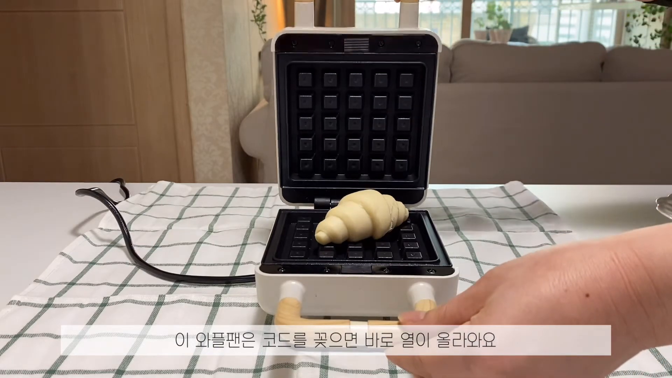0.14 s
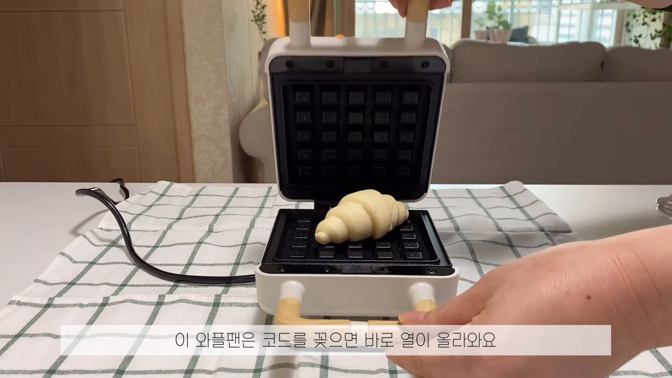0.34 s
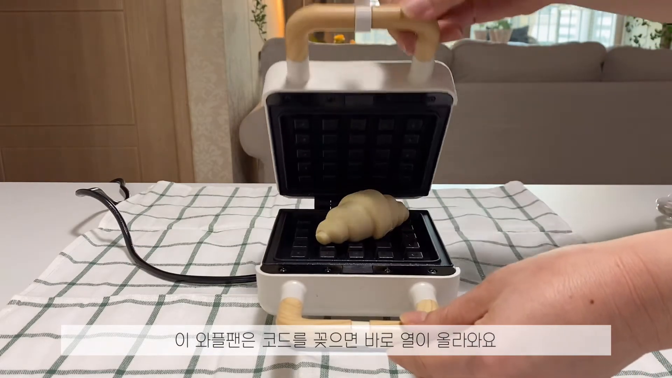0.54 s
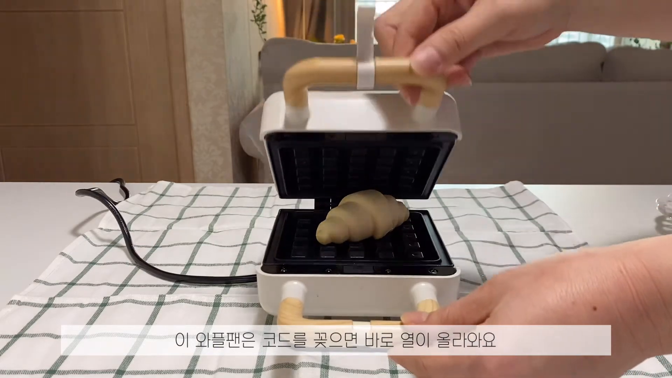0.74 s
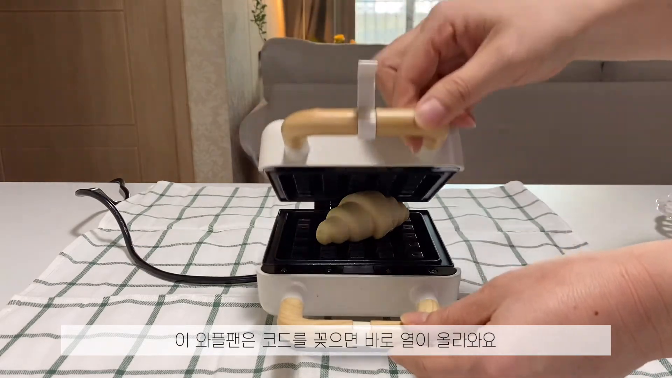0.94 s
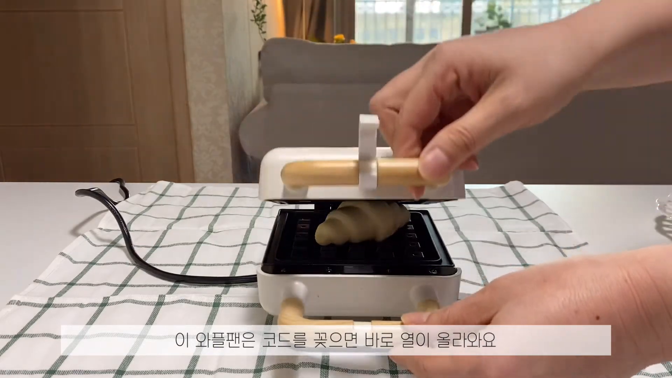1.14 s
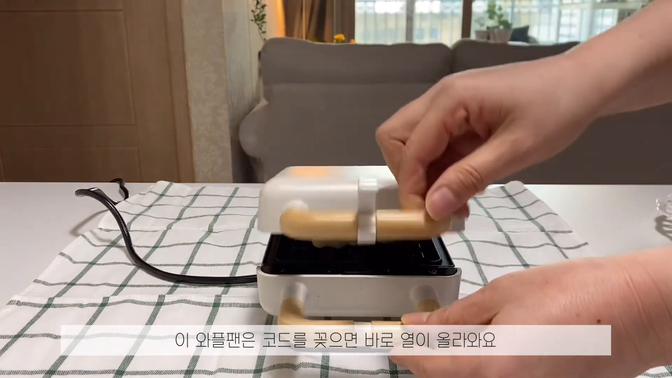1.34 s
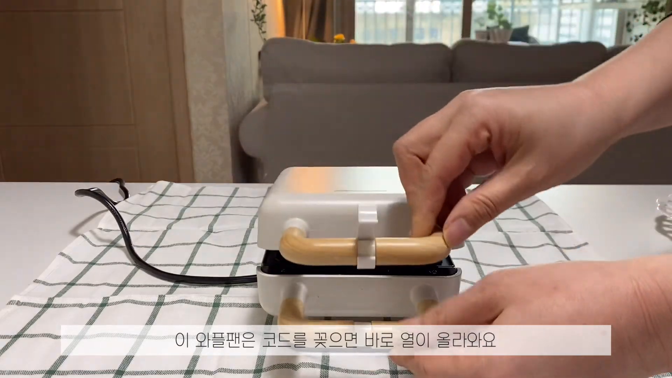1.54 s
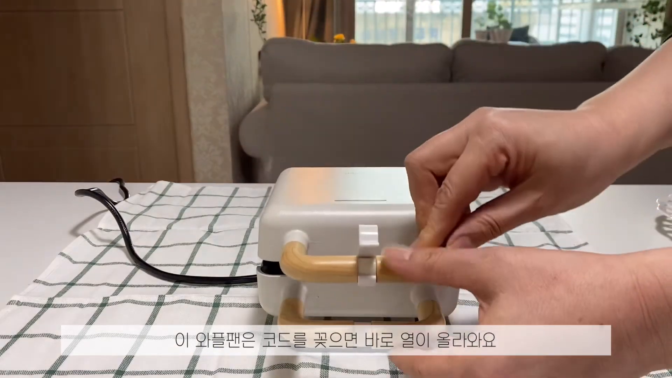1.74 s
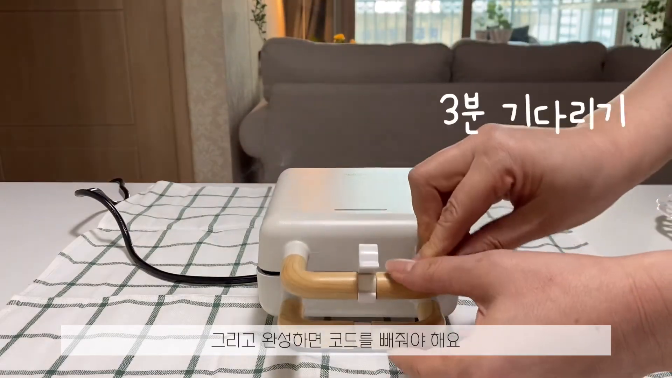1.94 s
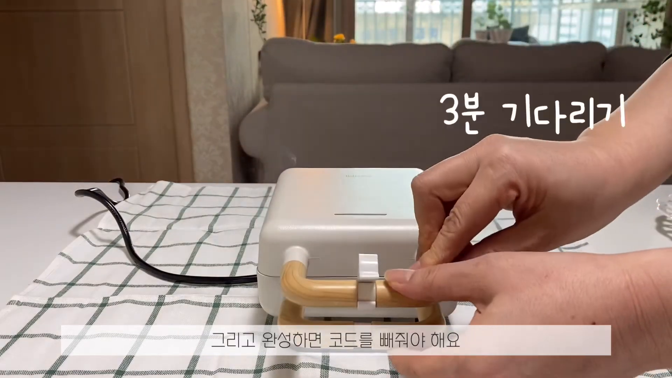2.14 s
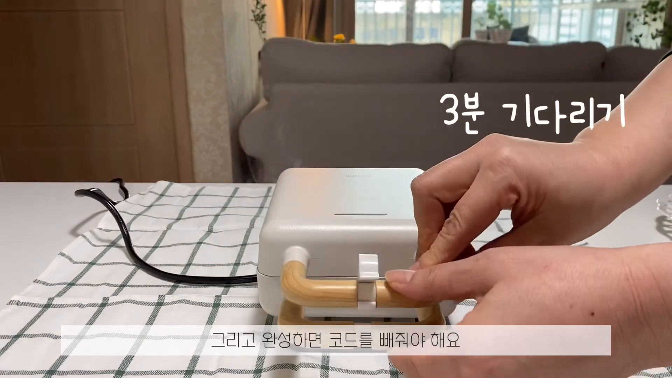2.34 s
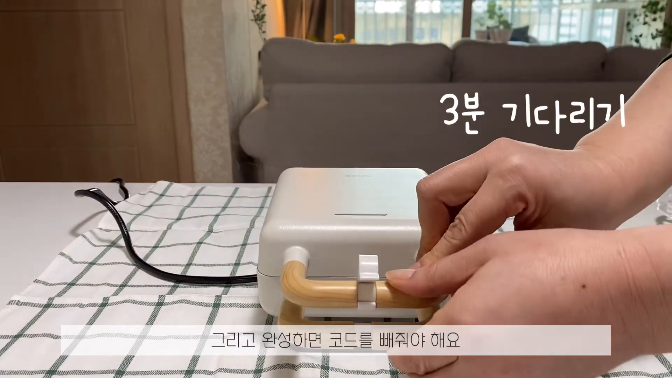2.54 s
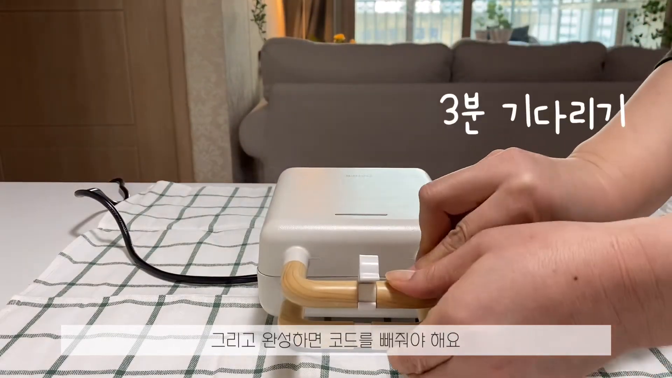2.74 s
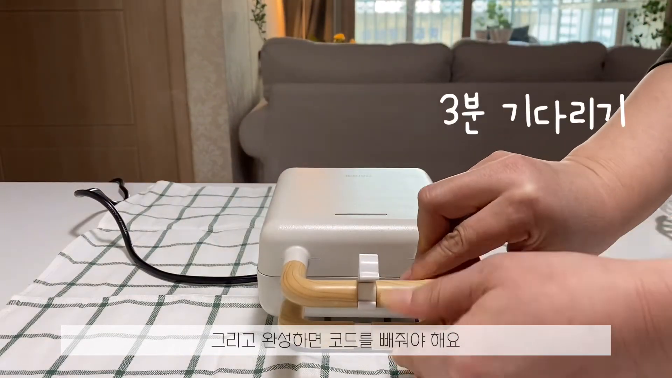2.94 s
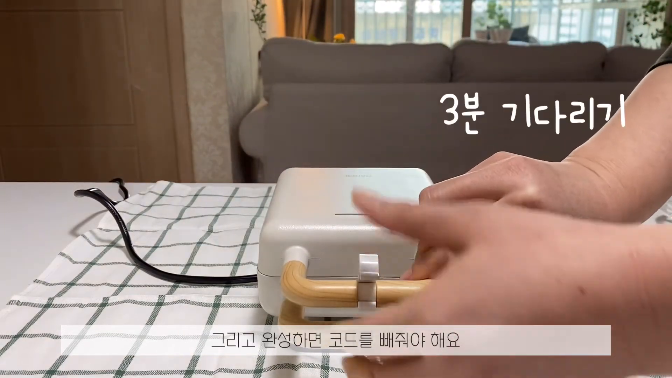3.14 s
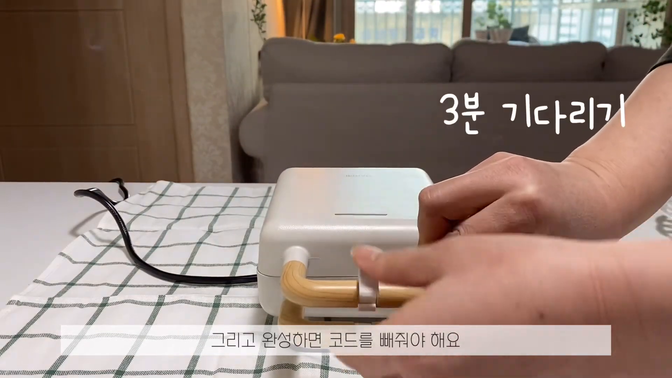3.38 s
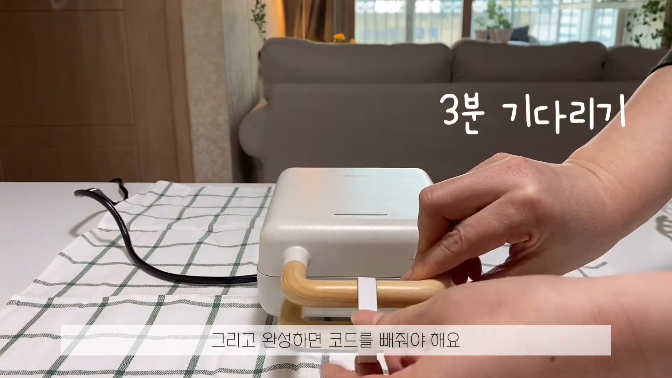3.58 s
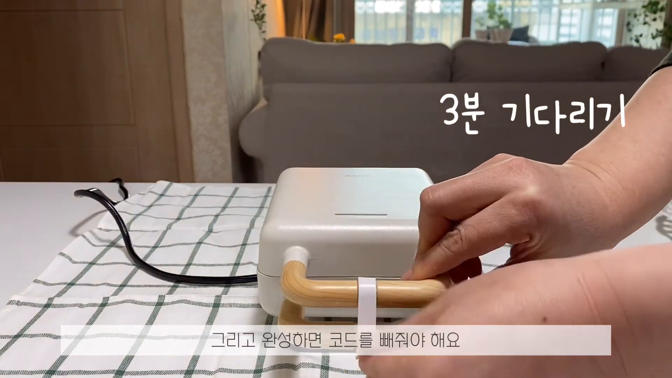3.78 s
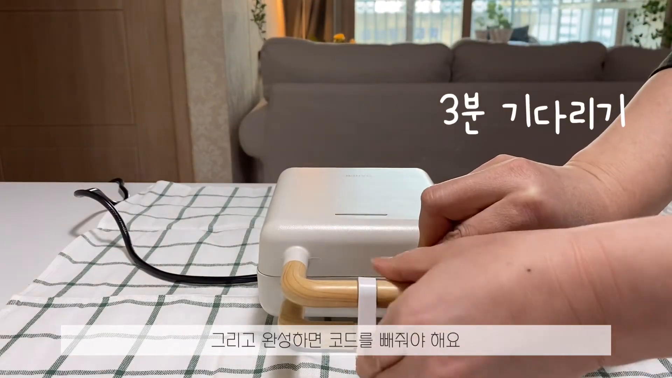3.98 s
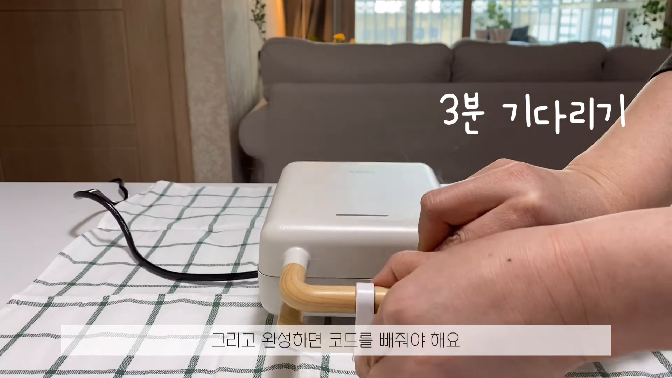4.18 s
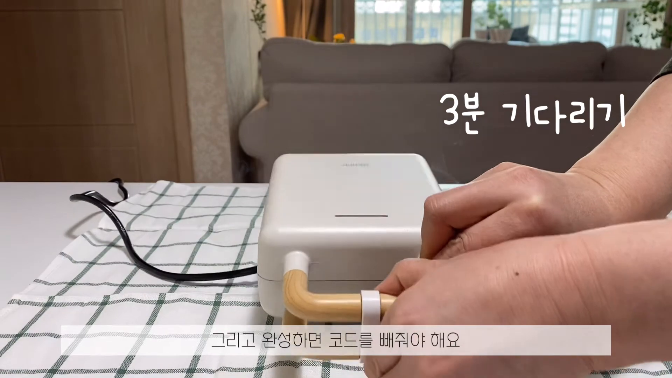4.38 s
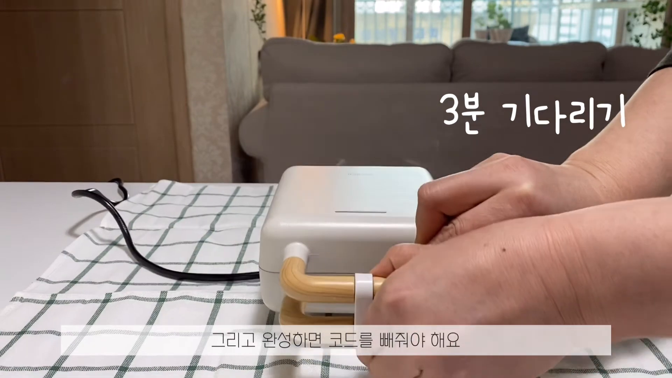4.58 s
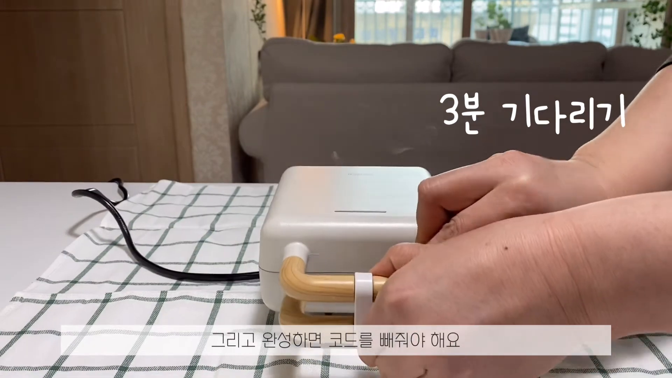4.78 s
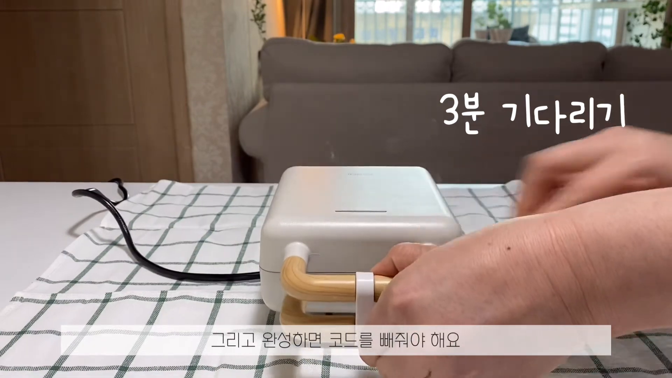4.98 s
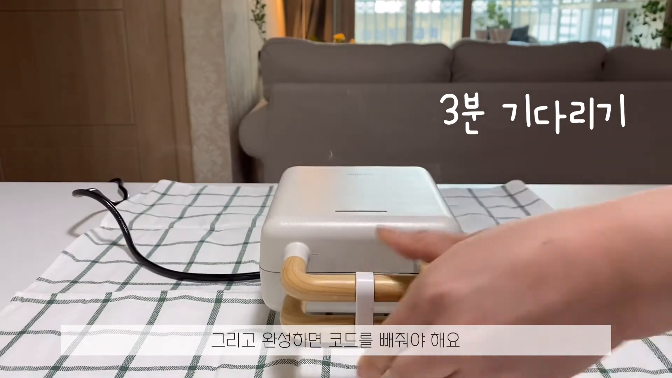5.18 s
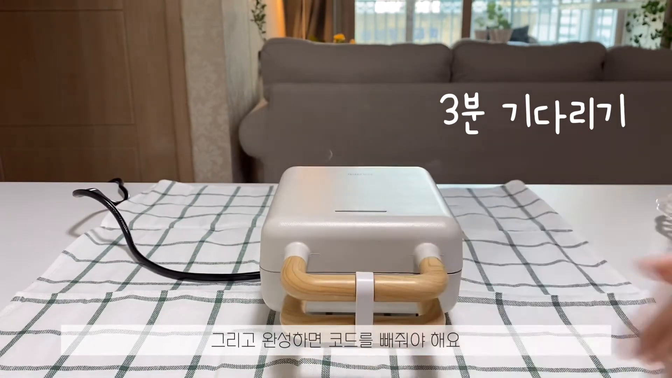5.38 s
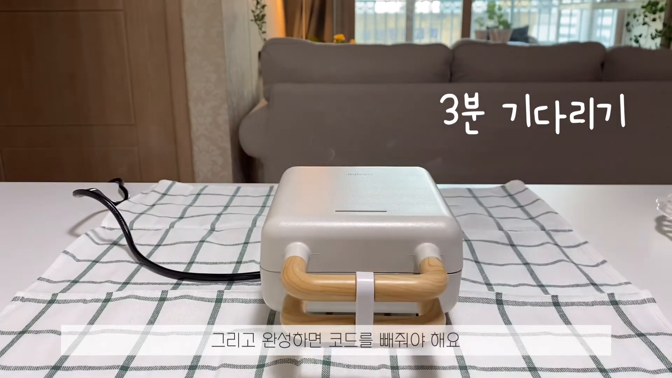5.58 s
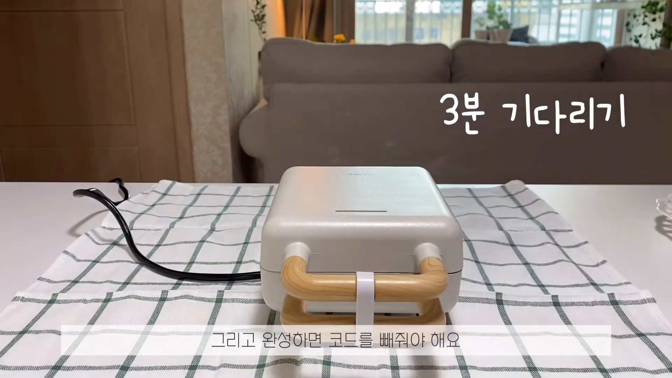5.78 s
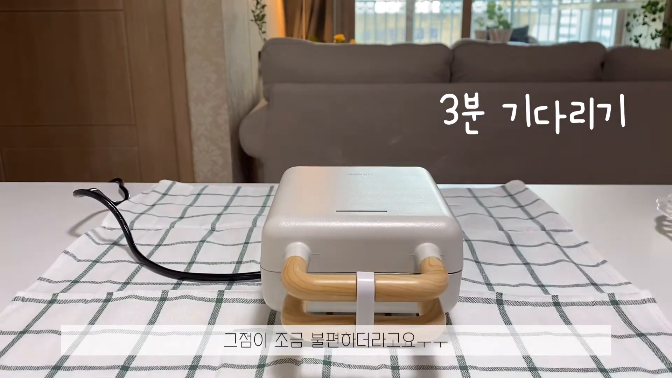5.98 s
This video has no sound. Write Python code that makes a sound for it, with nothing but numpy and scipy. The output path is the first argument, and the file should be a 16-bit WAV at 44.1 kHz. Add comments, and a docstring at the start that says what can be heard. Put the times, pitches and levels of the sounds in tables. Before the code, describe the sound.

A small, quiet room with faint low rumble and steady soft air noise, heard close in stereo. Slight handling rumble at the start; from 0.8 s tiny hinge ticks and creaks, then at 1.24 s a loud, hollow, ringing clack from the open lid. Thin gritty scraping and weaker ticks continue until about 1.9 s, when the lid seats with a rounded, moderately loud knock and low table thump. Soft taps come at 2.1, 2.5 and 2.8 s. From 3.1 s fingers slide lightly over plastic with faint clicks; a crisp smaller click at 3.6 s and a barely audible squeak at 3.8 s. Two hard, dry plastic snaps crack at 4.0 and 4.12 s, the second loudest. At 4.39 s the appliance drops with a deep thud, rocking in five quick, weakening taps with two tiny squeaks until 4.75 s. A faint tick or two near 5 s, then quiet room to the end.

```python
"""The lid of a small waffle maker is lowered on a kitchen table, close to a stereo microphone in a small, quiet room.
Its hinge slips, ringing the open lid, and scrapes in gritty noise; the lid seats with a knock that rings the case.
Fingers slide over the plastic latch until it snaps over the handle, each snap a crack and a short ring.
The tipped appliance drops back on its feet and rocks; short squeaks sound, and low thumps leave the table swinging.
Behind it lie faint rumble and groan, steady air noise, single echoes and a diffuse room tail."""
import sys
import numpy as np
from scipy import signal
from scipy.fft import rfft, irfft
from scipy.io import wavfile
from scipy.ndimage import uniform_filter1d

SR = 44100
rng = np.random.default_rng(int(sys.argv[2]) if len(sys.argv) > 2 else 0)


def transcribe(signal):
    """Save signal, clipped to [-1, 1], as a 16-bit WAV file at the path in sys.argv[1]."""
    frames = np.atleast_2d(signal).T
    limited = np.clip(frames, -1, 1)
    pcm = np.round(limited * 32767).astype(np.int16)
    wavfile.write(sys.argv[1], SR, pcm)


N = 265482
TIME, HZ = np.arange(N) / SR, np.fft.rfftfreq(N, 1 / SR)

# Event levels are set before the gain of their layer; spectrum and mode levels are relative.
# slips of the hinge: (time [s], level [dB], hardness: treble relative to the body [dB])
HINGE_SLIPS = [(0.799, -62.5, 10), (.821, -49, -18.5), (0.881, -43.5, -25), (.955, -44.5, -25.5),
               (1.093, -43, -22.5), (1.175, -58.5, -4), (1.2358, -15, -23), (1.243, -21, -12.5),
               (1.356, -37.5, -17.5), (1.674, -58.5, 2), (1.722, -62, -10), (1.858, -50.5, -21),
               (1.866, -55.5, -5.5)]
# tone shared by all slips: bass and top in dB, mid as a share of the hardness
SLIP_BASS_DB, SLIP_MID_SHARE, SLIP_TOP_DB = -26, .88, -10
# modes of the open lid: (frequency [Hz], level [dB], t60 [s], left over right [dB])
LID_MODES = [(430, -36, 0.12, -14.5), (524, -11.5, 0.17, -1), (569, -3, 0.064, 3), (666.4, -3.5, 0.07, -7),
             (758, -16.5, 0.11, -3), (841.5, -4.5, 0.056, 9), (860, -34, 0.41, 1), (1072, -22, 0.076, 3),
             (1330, -6.5, 0.075, -4.5), (1760, -9, 0.062, -7), (2070, -2, 0.01, 2),
             (2670, -2.5, 0.012, 6.5), (3170, -3.5, 0.019, -0.5), (4534, -2, 0.027, 8),
             (5330, -6.5, 0.012, 19), (7300, -4.5, 0.01, 5)]
# bare blow on the open lid, a light plate that radiates little bass: (frequency [Hz], level [dB])
LID_CRACK_COLOUR = [(30, -16.5), (250, 16.5), (400, 6), (560, 32), (830, 32), (1000, 20.5), (2000, 20.5),
                    (2700, 17), (5000, 14.5), (12000, 19)]

# knocks that ring the shut appliance: lid seating, small knocks, the drop on the table:
# (time [s], level [dB], hardness [dB], bass relative to the body [dB])
CASE_KNOCKS = [(1.919, -27, -25.5, -15), (1.927, -26, -67, -11), (2.12, -53.5, -31.5, 7.5),
               (2.475, -45, -28, -4), (2.761, -41.5, -1.5, 4.5), (2.769, -38, -22, -13),
               (2.863, -38.5, -16.5, -23), (4.381, -36, -9.5, 9), (4.389, -32, -10.5, -9),
               (4.885, -57, -15, -10)]
KNOCK_MID_SHARE, KNOCK_TOP_DB = 0.58, -6  # tone shared by all knocks
# modes of the shut appliance: (frequency [Hz], level [dB], t60 [s], left over right [dB])
CASE_MODES = [(264.9, -19.5, 0.41, 1), (396, -2, 0.11, 2.5), (489.2, -8.5, 0.074, -2), (588, -5, 0.05, 4.5),
              (760, -5.5, 0.047, -5.5), (969, -12.5, 0.039, 14.5), (1096, -27, 0.22, -10),
              (1270, -21, 0.08, 1), (1657, -11.5, 0.067, -1), (2370, -25.5, 0.062, -13),
              (4180, -15, 0.019, 14)]
# bare blow on the case or the latch: (frequency [Hz], level [dB])
CRACK_COLOUR = [(30, -12), (200, 34), (330, 26), (500, 27.5), (1000, 25.5), (2000, 22), (3000, 12.5),
                (5000, 11.5), (12000, 15)]
# after the drop the appliance rocks from foot to foot, each rock a little weaker
ROCK_START_S, ROCK_PERIOD_S = 4.4895, .0583
ROCK_DB, ROCK_LOSS_DB, ROCK_HARD_DB, ROCK_BASS_DB = -48, 0.8, -25, 11.5

# clicks and snaps of the latch:
# (time [s], level [dB], then relative to it: bass [dB], upper mid [dB], treble [dB], top [dB])
LATCH_SNAPS = [(3.136, -48, -20.5, 5, -3, -12.5), (3.318, -58, -18, 9, -20.5, -30.5),
               (3.523, -79, -6, 12, 6, -6), (3.594, -50.5, -3.5, -2, -2, -12.5),
               (3.6005, -31, -12.5, 3.5, -1, 8.5), (4.0024, -13, -27.5, -7, -13.5, -8.5),
               (4.0108, -26.5, -20, -17, -25.5, -25), (4.117, -8.5, -16, -7, -6, -13.5),
               (4.697, -48.5, 7.5, -6.5, -10.5, -8), (5.0, -59.5, -0.5, -3.5, -12, -15)]
# modes of the latch and the handle it grips: (frequency [Hz], level [dB], t60 [s], left over right [dB])
LATCH_MODES = [(270.4, -7, 0.027, -6.5), (378, -22, 0.14, 2.5), (438, -20.5, 0.36, 0),
               (477, -5.5, 0.055, 9), (640, -9, 0.056, -5), (753, -7.5, 0.062, -5), (875, -9.5, 0.028, -1),
               (912, -11.5, 0.075, 2.5), (1004, -3.5, 0.0069, 5), (1109, -30, 0.41, 1),
               (1198, -9.5, 0.029, -3), (1645, -11.5, 0.024, -5.5), (1820, -4, 0.026, -6),
               (1950, -1.5, 0.024, 2.5), (2350, -23, 0.077, -3.5), (3134, -14.5, 0.019, 7.5),
               (3820, -14.5, 0.02, 4.5), (4314, -8, .024, 7.5), (4800, -9.5, 0.017, 8.5),
               (4936, -6.5, 0.015, 10), (5620, -11.5, .015, 4), (7050, -5, 0.011, 6.5),
               (10123, 1.5, 0.0056, -0.5), (12300, -1.5, 0.0051, 0.5), (15010, -6, .003, -6.5)]
# points of a blow's tone, one bass, two body, two upper mid, two treble, one top: (frequency [Hz])
TONE_POINTS_HZ = [290, 440, 950, 1500, 2300, 3800, 7500, 10000]

# low thumps of the table under the lid, the latch and the dropping appliance:
# (time [s], level [dB], pitch [Hz], swell time [s])
LOW_THUMPS = [(1.927, -44.5, 120.5, 0.0068), (1.935, -47, 55.6, .011), (2.125, -51.5, 67.2, 0.018),
              (2.488, -53.5, 127.4, 0.0099), (2.766, -49.5, 152.7, 0.0037), (3.608, -44, 66, 0.018),
              (4.013, -38.5, 84.2, 0.011), (4.124, -31.5, 84.8, 0.0061), (4.382, -34, 116.7, 0.0049),
              (4.394, -28, 48.6, .019), (4.425, -41, 99.3, 0.014)]
# modes of the loaded table: (frequency [Hz], level [dB], t60 [s])
TABLE_MODES = [(62.6, -49, 0.76), (109, -55, 0.32), (154, -40.5, 0.96), (284, -32, 0.89), (383.5, -29, .5)]

# the hinge scrapes in spurts as the lid comes down:
# (start [s], length [s], level [dB], fizz relative to it [dB])
HINGE_SCRAPES = [(1.025, 0.024, -75, 2), (1.1, 0.18, -76.5, 2), (1.155, 0.12, -69.5, -3),
                 (1.388, 0.19, -78.5, 2), (1.545, 0.057, -70, -2.5), (1.65, 0.25, -76.5, -5.5)]
SCRAPE_ATTACK_S, SCRAPE_RELEASE_S = .025, 0.024
# spectrum of the scraping hinge: (frequency [Hz], level [dB])
GRIT_COLOUR = [(1000, -5.5), (2000, -13.5), (3500, -22.5), (5300, -2), (6700, -12.5), (8500, -11.5),
               (11000, -23)]
# spectrum of its fine fizz: (frequency [Hz], level [dB])
HINGE_FIZZ_COLOUR = [(6000, -33), (9000, -7.5), (10800, -2), (13000, -15), (15500, -9.5)]
# strokes of skin over plastic and of the feet over cloth: (start [s], length [s], level [dB])
SLIDING_STROKES = [(3.134, 0.077, -74.5), (3.289, 0.037, -65), (3.436, 0.041, -72.5), (3.565, 0.045, -68.5),
                   (4.365, 0.036, -61.5), (4.552, .17, -83)]
STROKE_ATTACK_S, STROKE_RELEASE_S = .025, .014
# spectrum of skin sliding over plastic, used for all strokes: (frequency [Hz], level [dB])
SKIN_COLOUR = [(400, -16), (850, 8.5), (1300, -4.5), (1900, 4.5), (2700, -21.5), (4600, -14), (8000, -23),
               (14000, -17)]
# short squeaks, one before the snaps, two as the appliance rocks:
# (time [s], pitch [Hz], level [dB], swell time [s])
SQUEAKS = [(3.779, 1670, -72.5, 0.012), (4.605, 1306, -68, 0.0083), (4.661, 1354, -72, 0.0067)]

# hands push on the appliance: (start [s], length [s], rumble level [dB], groan level [dB])
HAND_PUSHES = [(0.055, 0.1, -63, -59.5), (0.693, 0.04, -58.5, -68), (1.079, 0.28, -61.5, -63),
               (1.45, 0.97, -67.5, -86), (2.462, 0.1, -58.5, -67), (2.753, 0.22, -61.5, -81.5),
               (3.676, 0.11, -71, -73.5), (3.984, 0.3, -50.5, -76.5)]
PUSH_ATTACK_S, PUSH_RELEASE_S = 0.062, 0.047
# the table shudders under the appliance until it comes to rest
SETTLE_START_S, SETTLE_S = 4.44, 0.3
SETTLE_RUMBLE_DB, SETTLE_FADE_DB_PER_S, SETTLE_GROAN_DB = -48, 25, -63.5
# background rumble of the room: (time [s], level [dB])
ROOM_RUMBLE = [(0, -67.5), (2.9, -65), (3.15, -71), (3.6, -71.5), (4.9, -66.5), (6.0, -69.5)]
# spectrum of the rumble: (frequency [Hz], level [dB])
TABLE_RUMBLE_COLOUR = [(20, -37.5), (40, -9), (59, 2.5), (80, -10), (120, -7), (170, -16.5), (270, -20.5),
                       (400, -33), (800, -79)]
# spectrum of the groaning case: (frequency [Hz], level [dB])
CASE_GROAN_COLOUR = [(150, -28), (280, -8.5), (400, 4.5), (520, 2.5), (680, -11.5), (820, -6.5), (980, -23),
                     (1300, -23.5), (2500, -49)]
MURK_DB, MURK_DB_PER_S = -76.5, -1.5  # faint low-mid background: level at the start, and its drift
# spectrum of the steady air noise: (frequency [Hz], level [dB])
AIR_COLOUR = [(180, -22.5), (300, -6.5), (577, -7), (975, -17), (7300, -28.5), (9030, -36.5),
              (11000, -27.5), (15000, -43.5)]
AIR_DB = -79.5

# echoes off nearby surfaces: (delay [s], left gain [linear], right gain [linear])
NEAR_ECHOES = [(.0031, 0.023, 0.033), (.0085, 0.077, 0.17), (0.0133, -0.096, -0.058), (0.017, .14, .1),
               (.029, 0.21, 0.13)]
# reverberation time of the room: (frequency [Hz], t60 [s])
ROOM_DECAY = [(100, .5), (450, .36), (1000, .36), (2000, .34), (5000, .27), (12000, .23)]
# spectrum of the room tail: (frequency [Hz], level [dB])
ROOM_COLOUR = [(60, -20.5), (250, -7), (500, -5.5), (800, -13), (1300, -10.5), (2000, -12), (3000, -6.5),
               (4700, -6.5), (7500, -9.5), (9000, -19), (11000, -14), (15000, -22.5)]
ROOM_WIDTH = .85  # side signal relative to mid
# phase lag of the right microphone port behind the left: (frequency [Hz], lag [rad])
PORT_LAG = [(100, 0), (400, .5), (520, -.3), (900, .7), (1300, 0), (1900, .6), (6500, 0), (9000, -3.1),
            (11300, -6.2), (13500, -9.4), (15500, -12.5)]
EDGE_HZ = 16300  # upper band limit of the recorder


def hinge_slips():
    """The hinge sticks and lets go, jolting the open lid."""
    events = [toned(*slip, SLIP_BASS_DB, SLIP_MID_SHARE, SLIP_TOP_DB) for slip in HINGE_SLIPS]
    return blows(events, LID_MODES, LID_CRACK_COLOUR, gain_db=-6, crack_db=4, spill_db=5,
                 lag_s=0.0004, rise_cycles=.4)


def case_knocks(rock_count=5):
    """Single knocks ring the shut case, as does the even rocking that follows its drop."""
    rocks = [(ROCK_START_S + k * ROCK_PERIOD_S, ROCK_DB - k * ROCK_LOSS_DB, ROCK_HARD_DB, ROCK_BASS_DB)
             for k in range(rock_count)]
    events = [toned(*knock, KNOCK_MID_SHARE, KNOCK_TOP_DB) for knock in CASE_KNOCKS + rocks]
    return blows(events, CASE_MODES, CRACK_COLOUR, gain_db=-2.5, crack_db=-7, spill_db=0.5,
                 lag_s=.002, rise_cycles=0.5)


def latch_snaps():
    """The plastic latch clicks and snaps, ringing itself and the handle it grips."""
    return blows(LATCH_SNAPS, LATCH_MODES, CRACK_COLOUR, gain_db=0.5, crack_db=-5, spill_db=3,
                 lag_s=0.0042, rise_cycles=0.62)


def toned(s, db, hard_db, bass_db, mid_share, top_db):
    """A harder contact lifts the treble, and the upper mids by a share of that."""
    return s, db, bass_db, mid_share * hard_db, hard_db, hard_db + top_db


def blows(events, modes, crack_colour, gain_db, crack_db, spill_db, lag_s, rise_cycles):
    """Each blow is a crack and ringing modes; returns the close sound and the click spilling into the room."""
    t = np.arange(SR // 2) / SR
    close, spill = np.zeros((2, N)), np.zeros(N)
    hz, mode_db, t60, pan_db = np.transpose(modes)
    # bending waves are dispersive: low modes arrive later and swell more slowly
    age = np.maximum(t - lag_s * hz[0] / hz[:, None], 0)
    turns = age * hz[:, None]
    swell = 1 - np.exp(-turns / rise_cycles)
    decay = np.exp(-np.log(1000) * age / t60[:, None])
    rings = np.sin(2 * np.pi * turns) * swell * decay
    sides = amp(np.array([pan_db, -pan_db]) / 2)
    bins = np.fft.rfftfreq(2048, 1 / SR)
    for s, db, bass, mid, treble, top in events:
        levels = db + np.array([bass, 0, 0, mid, mid, treble, treble, top])
        colour = list(zip(TONE_POINTS_HZ, levels))
        crack = causal(read(colour, bins) + read(crack_colour, bins))
        mode_gains = sides * amp(mode_db + read(colour, hz))
        add(close, s, mode_gains @ rings)
        add(close, s, amp(crack_db) * crack)
        add(spill, s, amp(spill_db) * crack)
    return amp(gain_db) * close, amp(gain_db) * spill


def causal(db):
    """The sharp-fronted, minimum-phase click that has the spectrum db, kept within 80 dB of its peak."""
    log_gain = np.log(amp(np.maximum(db, db.max() - 80)))
    circle = np.concatenate([log_gain, log_gain[-2:0:-1]])
    return np.fft.ifft(np.exp(np.conj(signal.hilbert(circle)))).real


def thumps():
    """Each low thump swells, dies away and leaves the table swinging in its modes."""
    t, out = np.arange(SR) / SR, np.zeros(N)
    for s, db, hz, swell in LOW_THUMPS:
        envelope = (t / swell) ** 2 * np.exp(2 - 2 * t / swell)
        add(out, s, amp(db) * envelope * np.sin(2 * np.pi * hz * t))
    ring = np.zeros(SR)
    for hz, db, t60 in TABLE_MODES:
        ring += amp(db) * np.sin(2 * np.pi * hz * t) * np.exp(-np.log(1000) * t / t60)
    return out + amp(-12.5) * signal.fftconvolve(out, ring)[:N]


def rubbing(grit_db=0, fizz_db=-5, skin_db=1):
    """Irregular tiny slips make the grit and fizz of the hinge, and the sliding strokes."""
    scrape, sizzle, slide = np.zeros((3, N))
    for start, length, db, bright_db in HINGE_SCRAPES:
        spurt = amp(db) * gesture(start, length, SCRAPE_ATTACK_S, SCRAPE_RELEASE_S)
        scrape += spurt
        sizzle += amp(bright_db) * spurt
    for start, length, db in SLIDING_STROKES:
        slide += amp(db) * gesture(start, length, STROKE_ATTACK_S, STROKE_RELEASE_S)
    grit = friction(scrape, GRIT_COLOUR, slips_per_s=200, spread_db=3.2, hiss=.42, lurch_db=1.8)
    fizz = friction(sizzle, HINGE_FIZZ_COLOUR, slips_per_s=300, spread_db=3.5, hiss=.45, lurch_db=1.5)
    skin = friction(slide, SKIN_COLOUR, slips_per_s=900, spread_db=3, hiss=.6, lurch_db=1.8)
    return amp(grit_db) * grit + amp(fizz_db) * fizz + amp(skin_db) * skin


def friction(gain, colour, slips_per_s, spread_db, hiss, lurch_db):
    """Tiny slips of uneven size over a smooth hiss, under a pressure that lurches."""
    happens = rng.random(N) < slips_per_s / SR
    sizes = amp(spread_db * np.minimum(rng.exponential(1, N), 4)) * happens
    grains = evened(sizes * rng.choice([-1, 1], N)) + hiss * rng.standard_normal(N)
    pressure = evened(uniform_filter1d(rng.standard_normal(N), size=600))
    return gain * coloured(grains * amp(lurch_db * pressure), colour)


def squeaks():
    """Each squeak is a short tone of wavering pitch that swells and dies away."""
    t, out = TIME[:SR // 5], np.zeros(N)
    for s, hz, db, swell in SQUEAKS:
        waver = evened(uniform_filter1d(rng.standard_normal(len(t)), size=60))
        phase = 2 * np.pi * np.cumsum(hz * (1 + 0.028 * waver)) / SR
        envelope = t / swell * np.exp(1 - t / swell)
        add(out, s, amp(db) * envelope * np.sin(phase))
    return out


def handling():
    """Pushes and settling make the table rumble and the case faintly groan, over the low background."""
    rumble = amp(np.interp(TIME, *np.transpose(ROOM_RUMBLE)))
    groan = amp(MURK_DB + MURK_DB_PER_S * TIME)
    # independent noises add in power, hence hypot
    for start, length, rumble_db, groan_db in HAND_PUSHES:
        push = gesture(start, length, PUSH_ATTACK_S, PUSH_RELEASE_S)
        rumble = np.hypot(rumble, amp(rumble_db) * push)
        groan = np.hypot(groan, amp(groan_db) * push)
    settle = gesture(SETTLE_START_S, SETTLE_S, attack_s=0.014, release_s=0.083)
    fade_db = SETTLE_FADE_DB_PER_S * np.maximum(TIME - SETTLE_START_S, 0)
    rumble = np.hypot(rumble, amp(SETTLE_RUMBLE_DB - fade_db) * settle)
    groan = np.hypot(groan, amp(SETTLE_GROAN_DB) * settle)
    return rumble * noise(TABLE_RUMBLE_COLOUR, width=.14) + groan * noise(CASE_GROAN_COLOUR, width=.5)


def air():
    """Steady, wide noise of the quiet room."""
    return amp(AIR_DB) * noise(AIR_COLOUR, width=0.9)


def echoes(x, dull_hz=1500):
    """Single echoes off nearby surfaces; cloth swallows their treble."""
    dull = signal.sosfilt(signal.butter(2, dull_hz, fs=SR, output="sos"), x)
    out = np.zeros((2, N))
    for delay, left, right in NEAR_ECHOES:
        add(out, delay, dull * np.array([[left], [right]]))
    return out


def room(x, onset_s=0.0013, width=ROOM_WIDTH):
    """A diffuse stereo tail of noise that dies band by band."""
    mid, side = rng.standard_normal((2, SR))
    diffuse = np.array([mid + width * side, mid - width * side])
    hz, t, z = signal.stft(diffuse, SR, nperseg=256)
    t60 = read(ROOM_DECAY, hz)[:, None]
    decay = np.exp(-np.log(1000) * t / t60)
    # a longer decay starts lower, so that t60 leaves the energy of a band alone
    level = amp(read(ROOM_COLOUR, hz))[:, None] * np.sqrt(np.log(1000) * 2 / (t60 * SR))
    tail = signal.istft(z * decay * level, SR, nperseg=256)[1][:, :SR]
    onset = 1 - np.exp(-(TIME[:SR] / onset_s) ** 2)
    tail = tail * onset / np.hypot(1, width)
    return signal.fftconvolve(x[None], tail, axes=1)[:, :N]


def ports(x):
    """Direct sound reaches the two microphone ports out of step."""
    lag = read(PORT_LAG, HZ)
    return irfft(rfft(x) * np.array([np.ones(len(HZ)), np.exp(-1j * lag)]), N)


def gesture(start, length, attack_s, release_s):
    """The force of a movement: linear attack, hold, exponential release."""
    age = TIME - start
    attack = np.clip(age / attack_s, 0, 1)
    return attack * np.exp(-np.clip((age - length) / release_s, 0, 20))


def noise(colour, width):
    """Coloured stereo noise at rms 1; width is the size of the side signal."""
    mid, side = rng.standard_normal((2, N))
    return coloured(np.array([mid + width * side, mid - width * side]), colour)


def coloured(x, colour):
    """Shapes x by the spectrum colour and brings it to rms 1."""
    return evened(irfft(rfft(x) * amp(read(colour, HZ)), N))


def evened(x):
    """Brings x to rms 1."""
    return x / np.sqrt(np.mean(x ** 2) + 1e-20)


def read(points, hz):
    """A spectrum joined by straight lines on a log-frequency axis."""
    f, value = np.transpose(points)
    return np.interp(np.log(hz + 1), np.log(f + 1), value)


def amp(db):
    """Decibels to linear amplitude."""
    return 10 ** (np.asarray(db) / 20)


def add(mix, s, sound):
    """Adds sound to mix in place from time s in seconds, cut at the end of the mix."""
    part = mix[..., round(s * SR):][..., :sound.shape[-1]]
    part += sound[..., :part.shape[-1]]


def scene():
    """Close sounds, their echoes and room tail, over the quiet of the room."""
    contacts = hinge_slips(), case_knocks(), latch_snaps()
    near, spill = (sum(parts) for parts in zip(*contacts))
    rubs = rubbing() + squeaks()
    near = near + rubs + thumps()
    room_feed = spill + amp(-9.0) * near.mean(0) + amp(3.0) * rubs
    wet = echoes(near) + room(room_feed)
    quiet = handling() + air()
    return ports(near + quiet) + wet


def record(dry):
    """The recorder's low cut at 28 Hz and its upper band limit."""
    thinned = signal.sosfilt(signal.butter(2, 28, "high", fs=SR, output="sos"), dry)
    band_limit = signal.firwin(511, EDGE_HZ, window=("kaiser", 9), fs=SR)
    return signal.oaconvolve(thinned, band_limit[None], "same")


dry = scene()
out = record(dry)
transcribe(out)
```